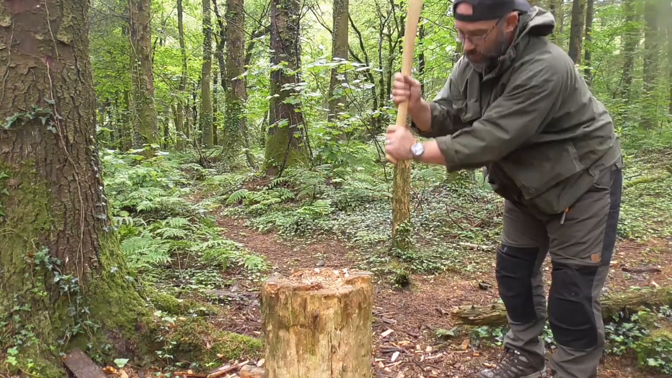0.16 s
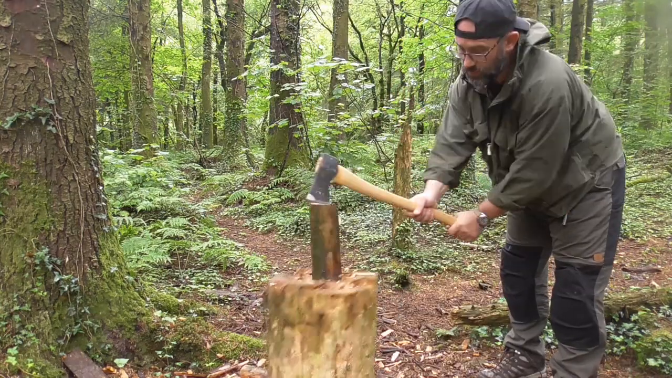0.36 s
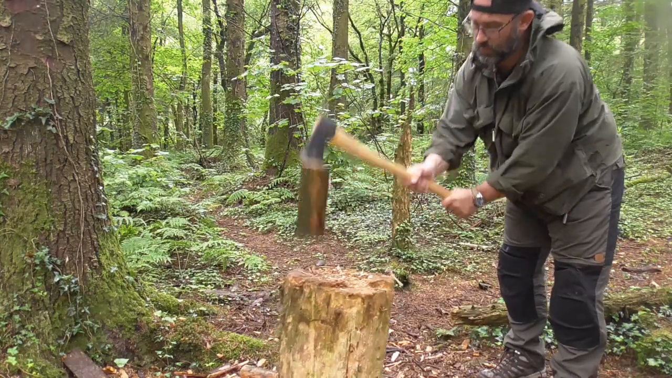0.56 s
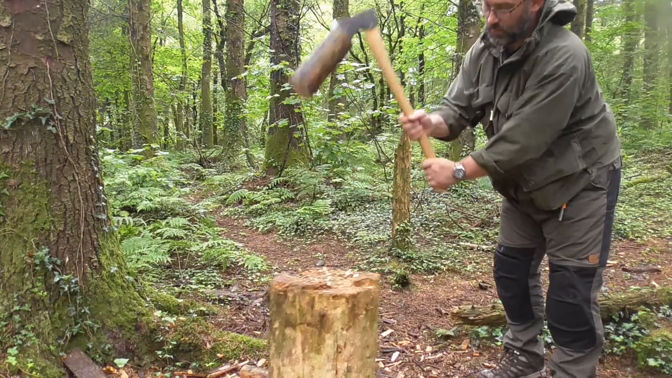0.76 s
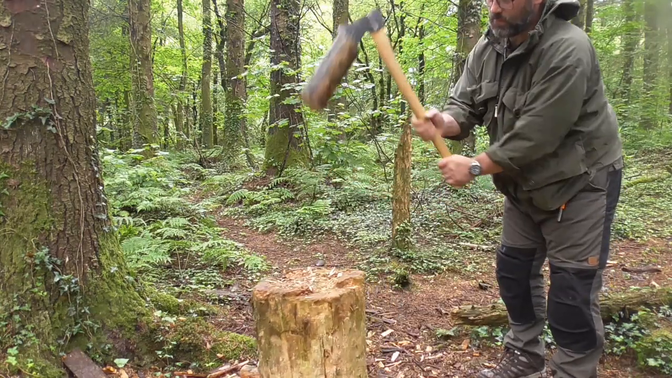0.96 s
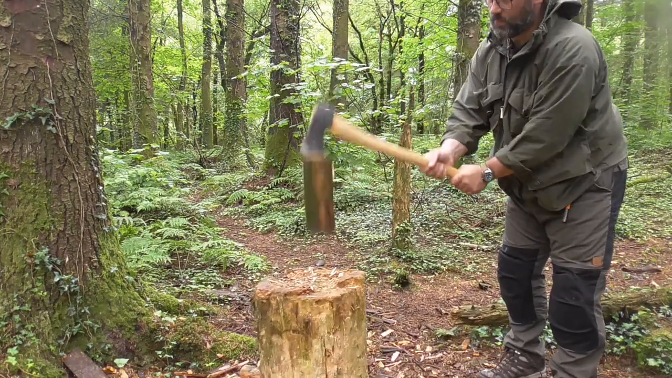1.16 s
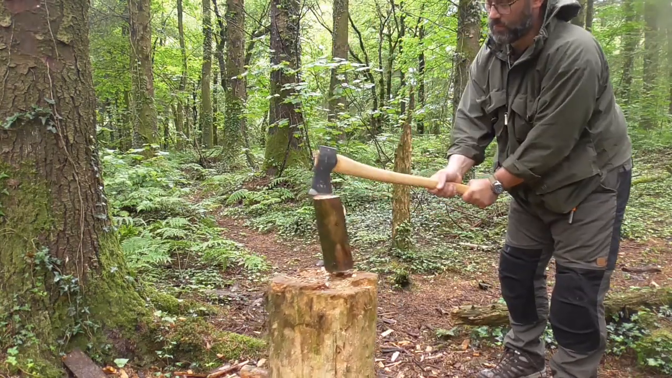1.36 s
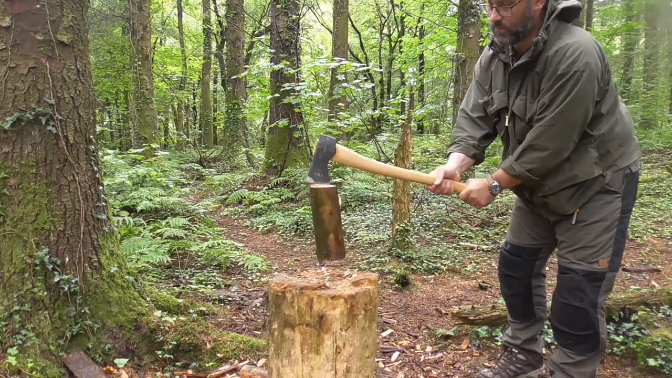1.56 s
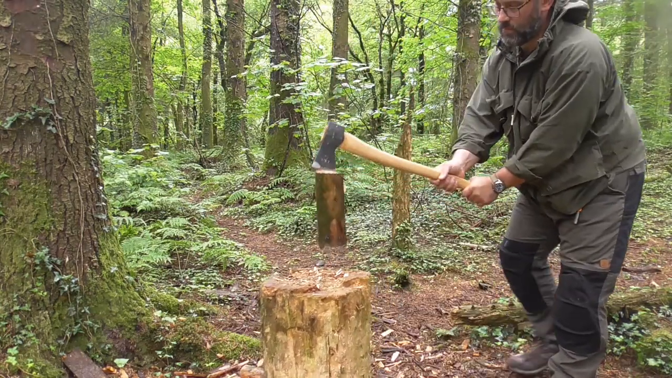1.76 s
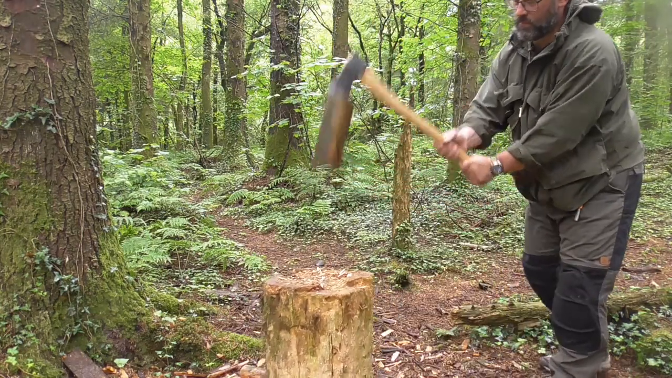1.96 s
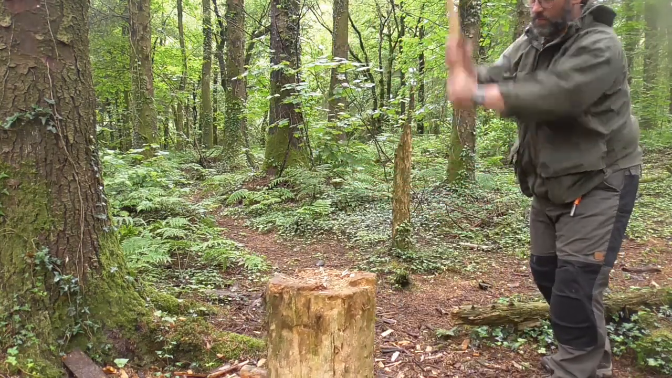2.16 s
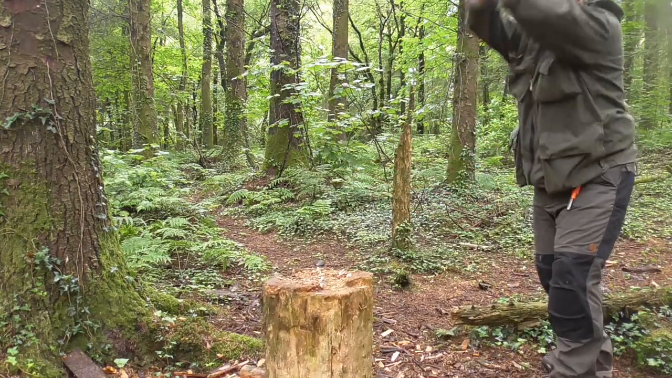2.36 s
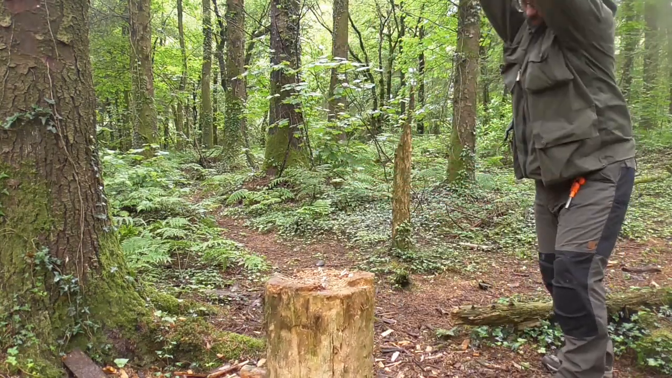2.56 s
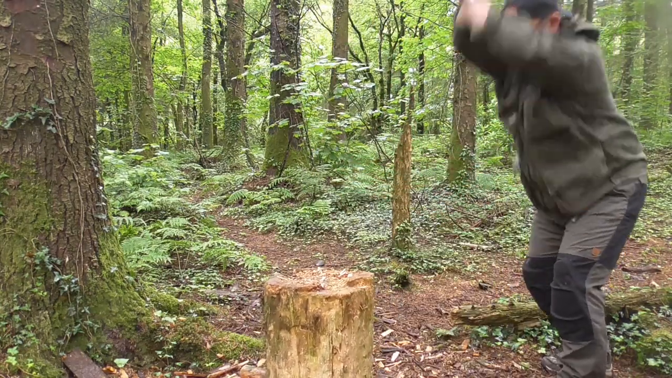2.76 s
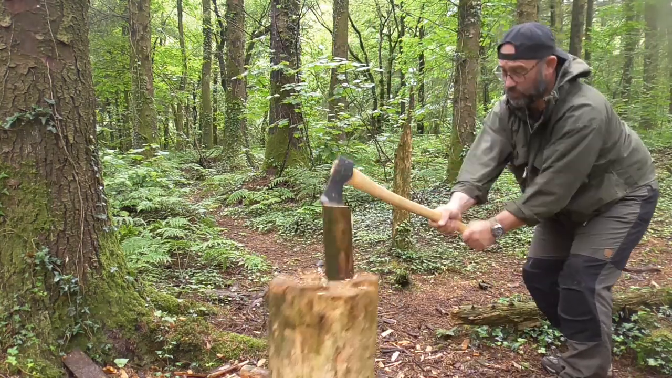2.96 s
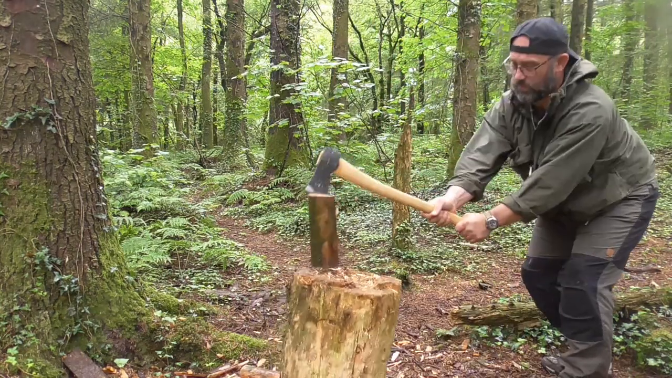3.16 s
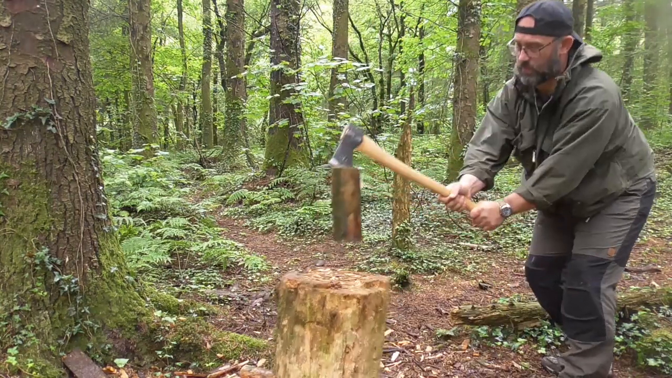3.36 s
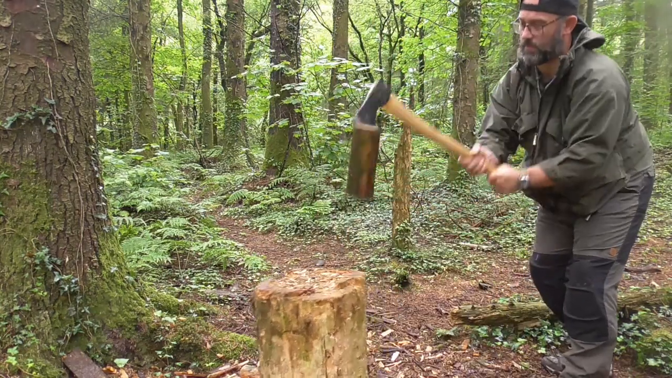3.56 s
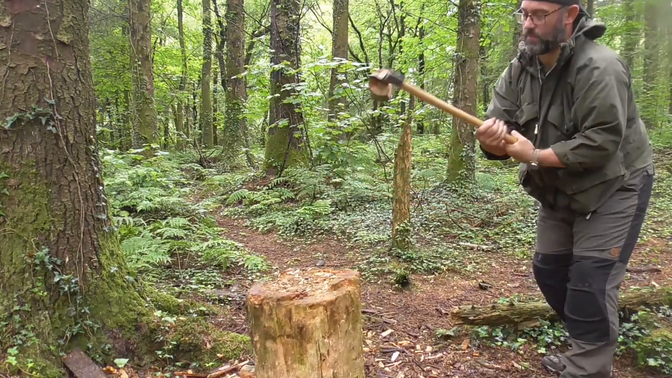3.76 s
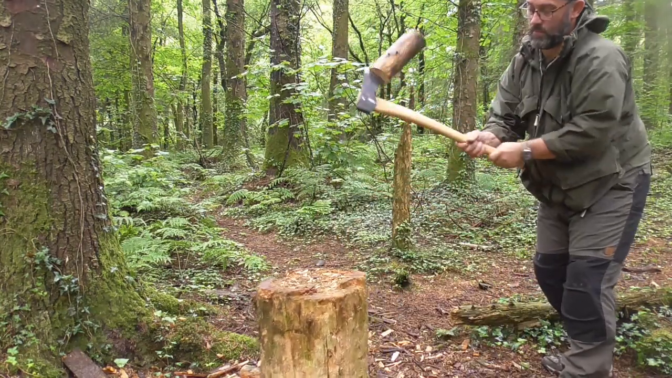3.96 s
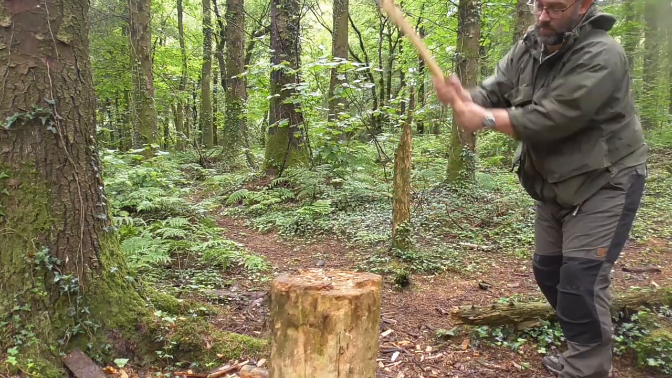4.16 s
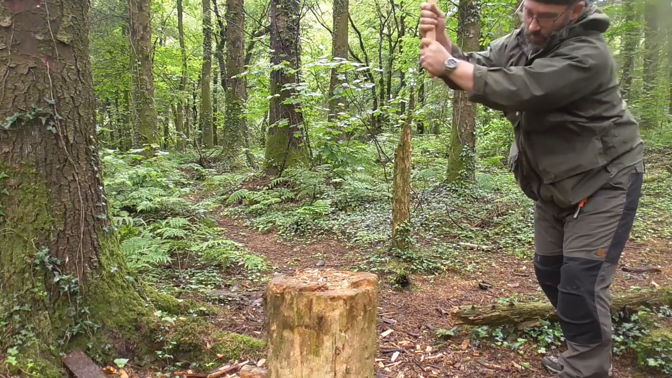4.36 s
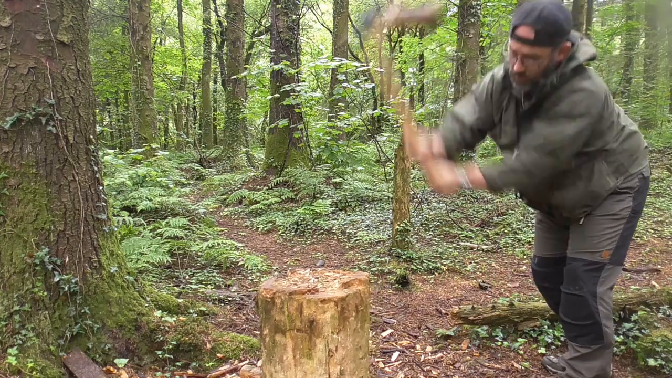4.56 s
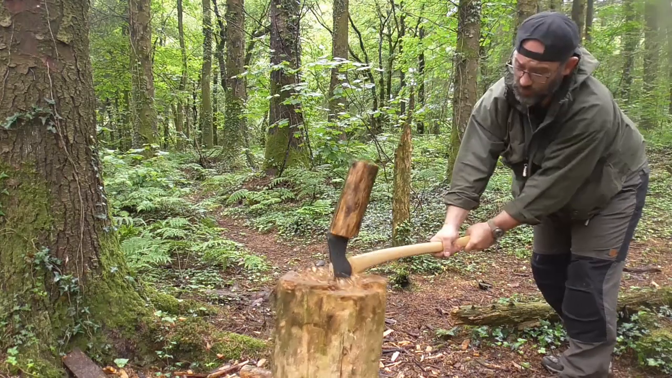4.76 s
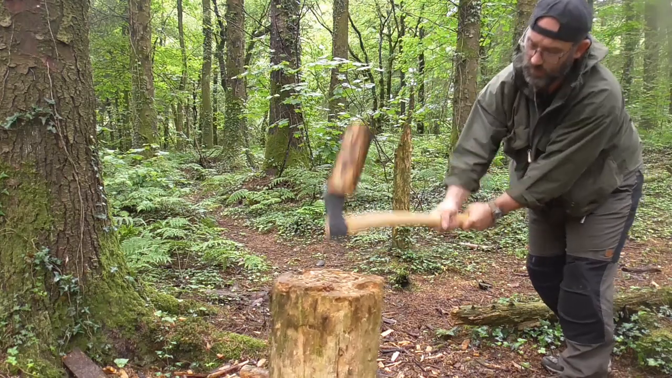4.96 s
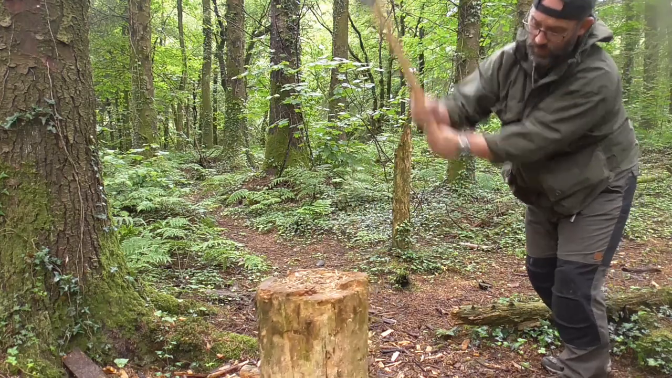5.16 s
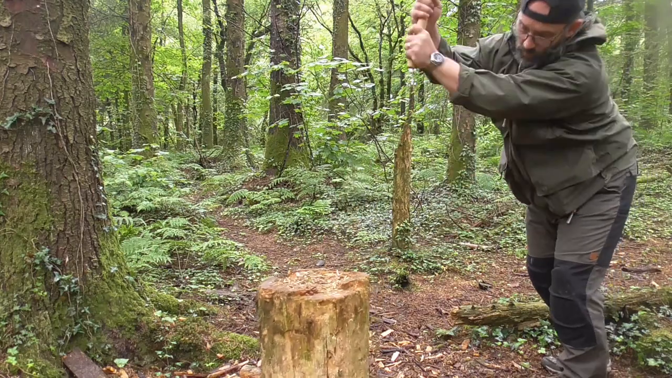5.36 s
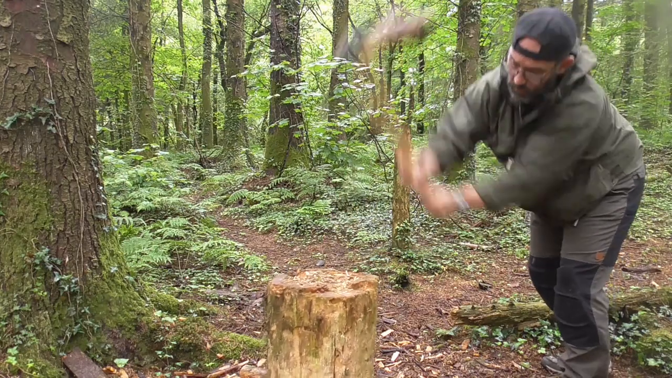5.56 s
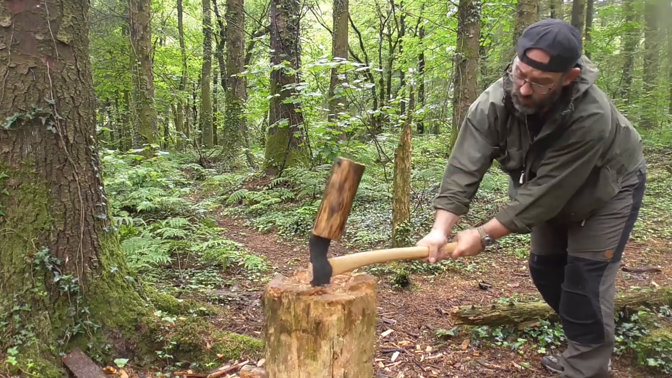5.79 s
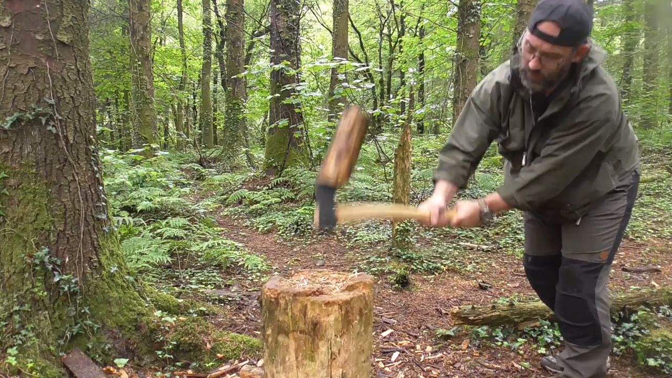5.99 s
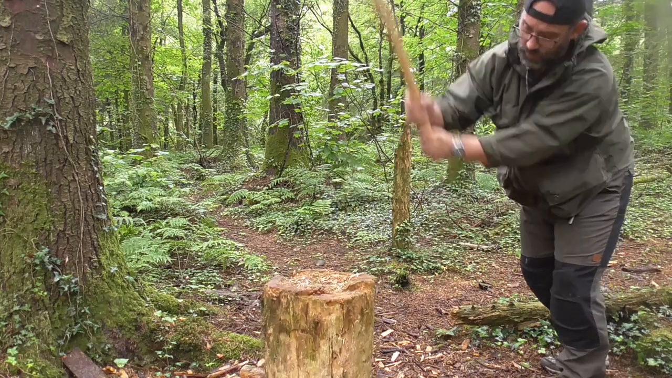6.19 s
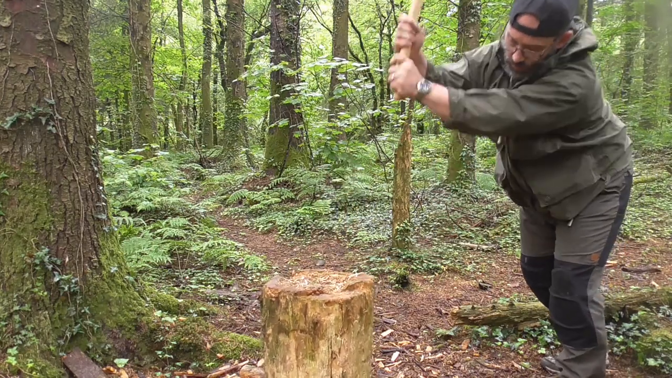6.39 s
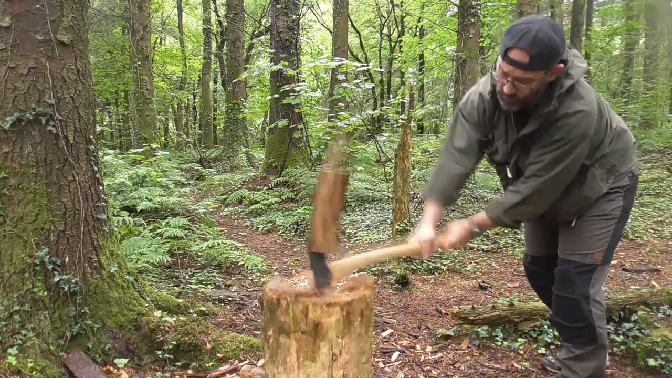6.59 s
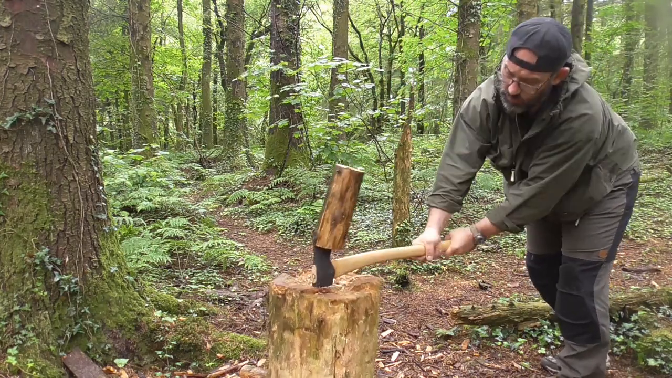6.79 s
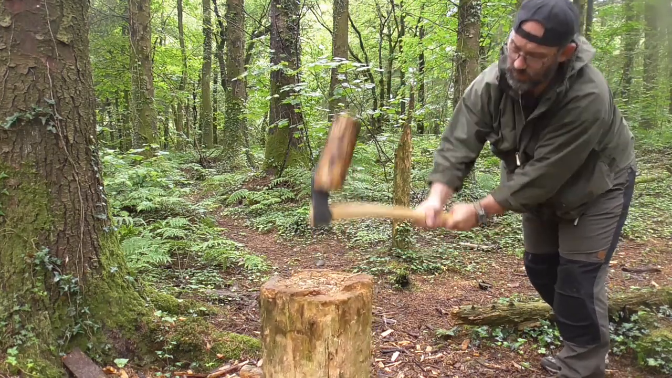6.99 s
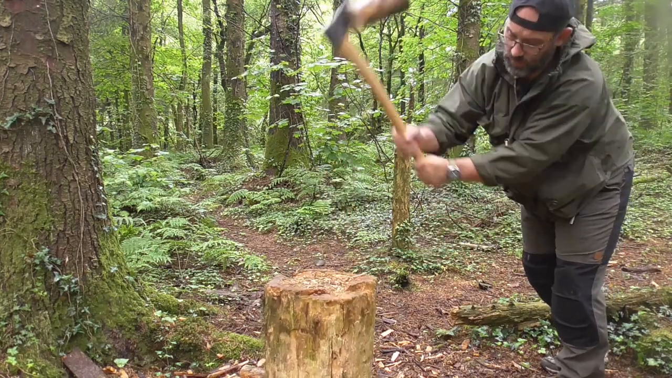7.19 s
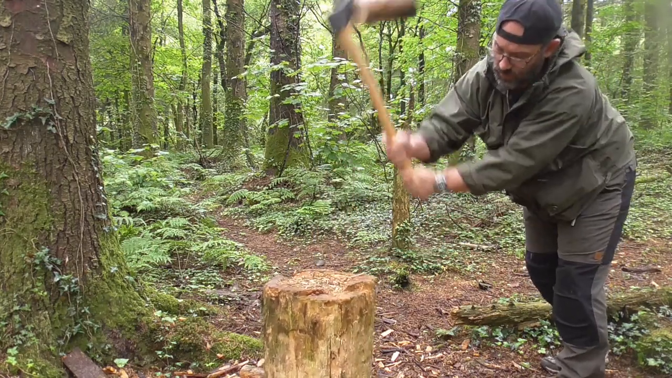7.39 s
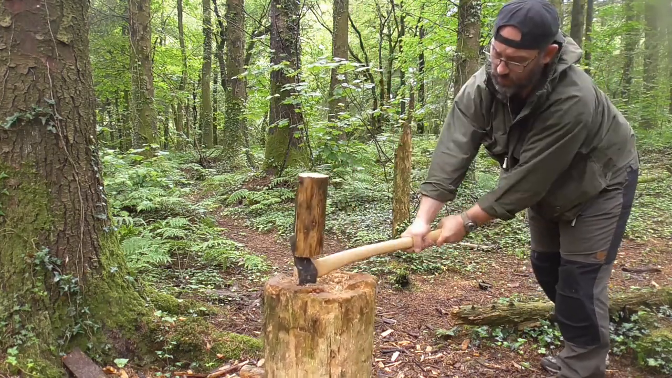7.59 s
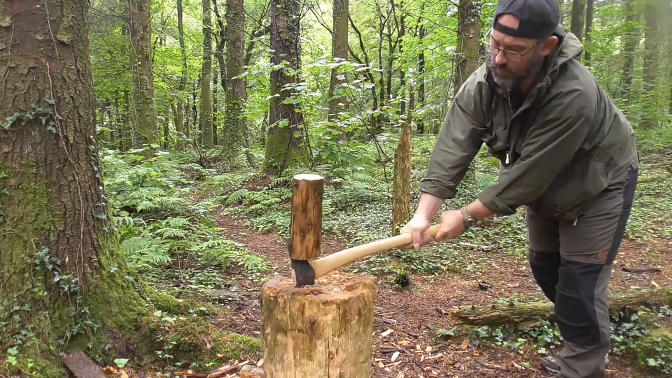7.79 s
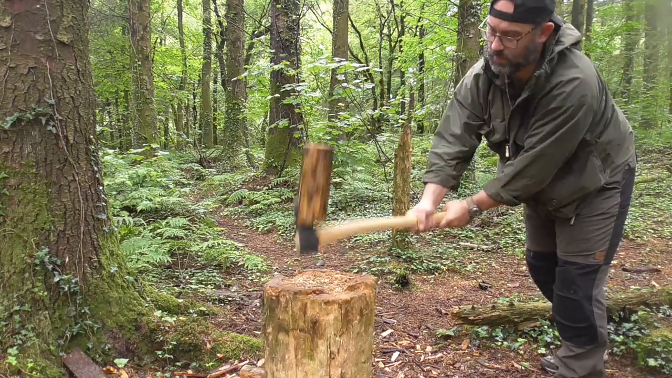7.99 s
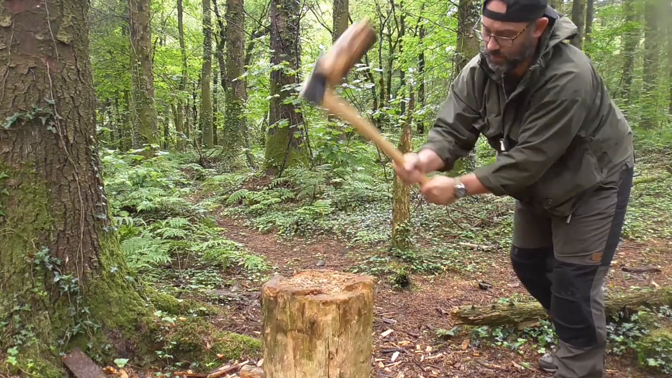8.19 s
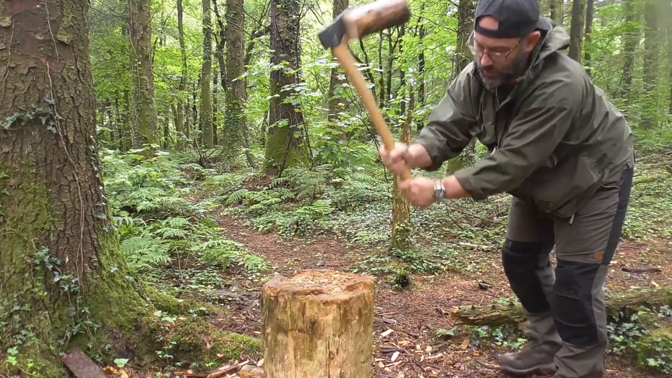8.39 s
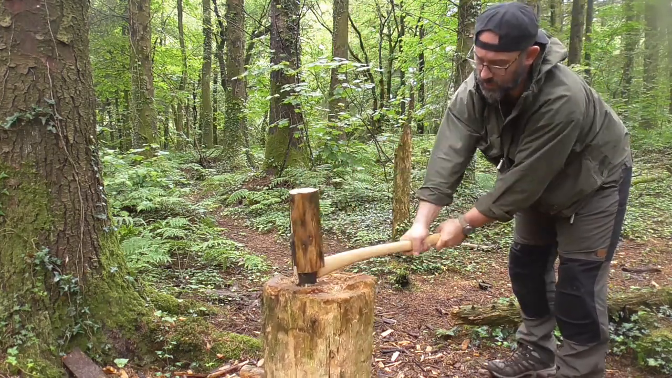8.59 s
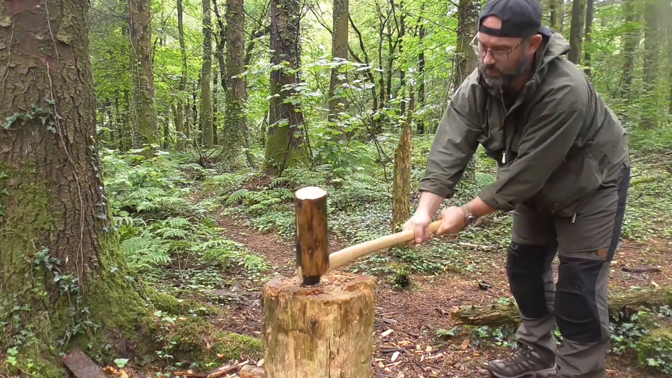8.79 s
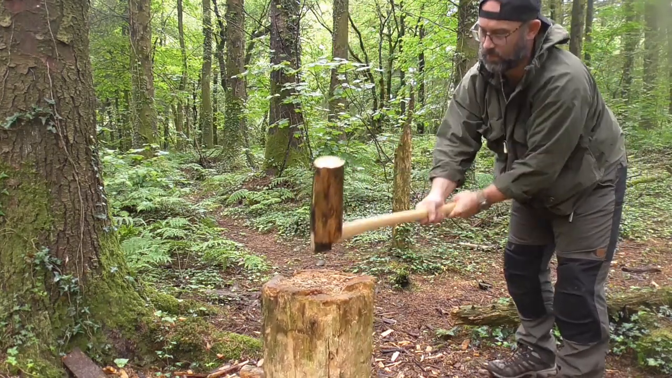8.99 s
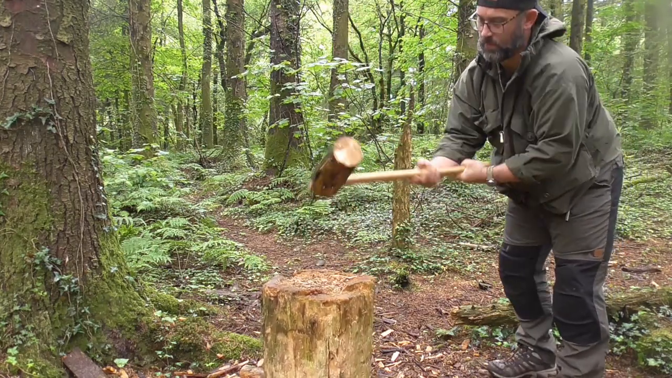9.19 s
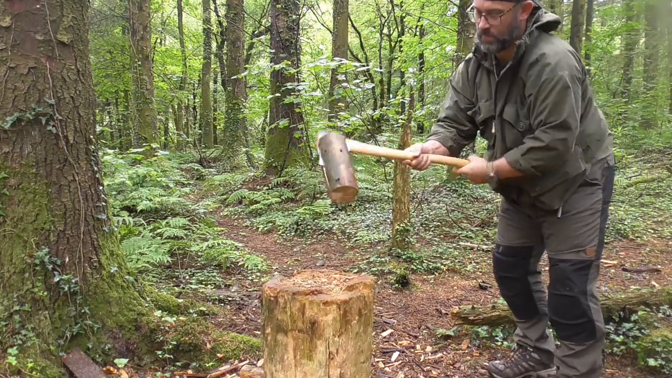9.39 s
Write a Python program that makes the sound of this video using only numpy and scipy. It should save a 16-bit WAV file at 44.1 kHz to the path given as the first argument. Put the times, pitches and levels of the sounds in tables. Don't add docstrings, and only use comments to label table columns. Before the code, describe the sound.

A quiet wood, heard in stereo from a few metres, with a very faint low distant drone. Soft jacket rustle and tiny dry ticks lead to a hollow wooden knock at 0.5 s, with a dull crack and ground thump. Until 3 s there is only cloth swishing, leaf hiss, small ticks and a faint bird whistle; then loose wood rattles around the heaviest blow at 3.1 s. Further slams follow at 4.8, 5.8, 6.8, 7.7 and 8.7 s, short and woody, with brighter, sharper fibre cracks and brief echoes off trunks. The block rocks back softly after most blows, and small chips patter down. Splinters tear and snap around 7.5-7.9 and 8.5 s; the last blow bursts into dense crackle. Light ticks, a thin bird call near 9.1 s and jacket rustle close it by about 9.5 s.

```python
import sys
import numpy as np
from scipy import signal
from scipy.fft import rfft, irfft, next_fast_len
from scipy.io import wavfile
from scipy.ndimage import uniform_filter1d, map_coordinates

SR = 44100
rng = np.random.default_rng(int(sys.argv[2]) if len(sys.argv) > 2 else 0)


def amplitude_ratio(level_db):
    exponent = np.asarray(level_db, float) / 20
    return 10 ** exponent


def waveform_to_disk(signal):
    frames = np.transpose(np.atleast_2d(signal))
    scaled = np.clip(frames, -1, 1) * 32767
    samples = np.round(scaled).astype(np.int16)
    wavfile.write(sys.argv[1], SR, samples)


N = 416304
BURST = SR // 4

# (time [s], knock level [dB])
STRIKES = [
    (.5211, -2.7),
    (3.1295, 1.9),
    (4.8131, 1.2),
    (5.7978, -.6),
    (6.7636, -4.5),
    (7.6874, -3),
    (8.7108, 1.2),
]
PAN_DB = [-2.5, -3, -2.5, -3, -0.8, 0.5, -2]
# (frequency [Hz], level [dB])
BRIGHT = [(4500, -23.5), (6300, -15.5), (7400, -6.5), (9500, -2), (12000, 0), (14500, -7.5), (16500, -24),
          (18000, -80)]
# (frequency [Hz], level [dB])
DULL = [(700, -41), (1600, -3.5), (2600, -6.5), (4000, -1.5), (5150, -5), (5800, -11.5), (9000, -57.5)]
# (frequency [Hz], level [dB])
JACKET = [(60, -40), (150, -18), (300, -6), (500, -3.5), (900, -8), (1400, -10), (1800, -22), (3000, -28),
          (6000, -85.5)]


def unit(x):
    return x / np.sqrt(np.mean(x ** 2) + 1e-20)


def peaked(x):
    return x / np.abs(x).max()


def along(points, hz):
    f, v = np.transpose(points)
    return np.interp(np.log(hz + 1), np.log(f + 1), v)


def filtered(x, response):
    n = x.shape[-1]
    m = next_fast_len(2 * n)
    return irfft(rfft(x, m) * response(np.fft.rfftfreq(m, 1 / SR)), m)[..., :n]


def coloured(spectrum, size):
    return unit(filtered(rng.standard_normal(size), lambda hz: amplitude_ratio(along(spectrum, hz))))


def dying(t, t60, rise):
    return (1 - np.exp(-t / rise)) * amplitude_ratio(-60 * t / t60)


def bump(t, at, wide):
    return np.exp(-.5 * ((t - at) / wide) ** 2)


def wobble(rate):
    return map_coordinates(rng.standard_normal(int(N * rate / SR) + 4), [np.arange(N) * rate / SR])


def add(out, s, x, pan_db=-2.0):
    part = out[:, round(s * SR):][:, :x.shape[-1]]
    part += (x * amplitude_ratio([[pan_db / 2], [-pan_db / 2]]))[:, :part.shape[1]]


def blows():
    # (crack [dB], crack t60 [s], 2-5 kHz share [dB], lingering crackle [dB], ground [dB])
    breakage = [
        (-21, 0.029, 0, -36, -28),
        (-17.5, 0.038, -1.5, -48, -29),
        (-9.5, 0.0139, 0, -42, -31.5),
        (-16, 0.023, -5, -39, -31),
        (-15, 0.05, -4.5, -31, -33),
        (-8, 0.03, -8, -35.5, -41),
        (-18.5, 0.047, -2.5, -34, -44),
    ]
    # (edge bite re push [ratio], push lag [ms], tearing lag [ms])
    contact = [(.4, 0, .5), (.45, 0, 0), (.22, 0, .4), (.3, 0, .6), (.1, -.3, -.2), (.2, 0, 1.6),
               (.45, .3, -.5)]
    body_lag_ms = [0, 0, 0, 0, .8, 0, 0]
    # (frequency [Hz], width [Hz], level [dB])
    upright = [
        [(115.5, 71, -3), (229, 86, 2), (319, 34, 4), (447, 33.5, -0.5), (657, 82, -3), (800, 54, -9.5),
         (1137, 87, -0.5), (1390, 127, -2), (1600, 89, -10), (2450, 180, -7)],
        [(148.3, 94.6, -5.5), (176.6, 29, -55), (267, 23, -13), (456, 64, -1.5), (603, 34, -15.5),
         (703, 76, -16.5), (885, 73, -6), (1027, 100, -10), (1270, 93, -8), (1577, 52, -16)],
    ]
    # (frequency [Hz], width [Hz], level [dB])
    turned = [
        [(183.5, 166, -2), (287, 150, -0.5), (350, 51, -7), (456, 55, 0.5), (658, 115, -6.5), (874, 67, -6.5),
         (1110, 157, -5.5), (1266, 120, -5), (1524, 96, -14.5), (2140, 81, -9)],
        [(127, 100, -12.5), (196, 66, -5), (323, 55, 1), (570, 73, 1.5), (717, 140, -3), (965, 77, -3),
         (1160, 113, -1), (1607, 78, -4.5), (2220, 190, -5.5)],
        [(125, 34, -6), (203, 63, 0), (330, 94, 2.5), (480, 108, 3), (690, 190, -9.5), (1082, 77, 2),
         (1500, 43, -8.5), (2010, 480, -8), (2640, 100, -20)],
    ]
    # (frequency [Hz], width [Hz], level [dB])
    opened = [
        [(105.1, 42, -12), (217.5, 102, -3), (358, 126, -0.5), (480, 157, -5.5), (692, 111, -15.5),
         (806, 45, -16), (950, 125, -13.5), (1310, 77, -10.5), (1613, 79, -13), (2064, 74, -14)],
        [(102, 50, -19), (169, 40, -12), (340, 155, -1), (555, 190, -3), (668, 120, -1.5), (853, 110, 1.8),
         (973, 110, 0.5), (1260, 62, -9.5), (1504, 75, -9.5), (1840, 44, -13)],
    ]
    out = np.zeros((2, N))
    for strike, broken, touch, lag_ms, pan_db, modes in zip(
            STRIKES, breakage, contact, body_lag_ms, PAN_DB, upright + turned + opened):
        s, db = strike
        crack_db, crack_t60, dull_db, linger_db, ground_db = broken
        bite, push_ms, tear_ms = touch
        hit = wood_knock(modes, db, bite, push_ms, lag_ms)
        hit = hit + tearing(crack_db, crack_t60, dull_db, linger_db, tear_ms)
        add(out, s, hit + amplitude_ratio(-32.0) * echo(hit.mean(axis=0)), pan_db)
        add(out, s, ground_thump(ground_db), pan_db=1.0)
    return out


def wood_knock(modes, db, bite, push_ms, lag_ms):
    t = np.arange(BURST) / SR
    lean_db = rng.normal(0, .95, len(modes)) * [[1], [-1]]

    def wood(f):
        total = 0
        for k, (hz, width_hz, mode_db) in enumerate(modes):
            gain = (-1) ** k * amplitude_ratio(mode_db + lean_db[:, k, None])
            resonance = 1j * f * width_hz / (hz * hz - f * f + 1j * f * width_hz)
            lag = np.exp(-2j * np.pi * f * lag_ms / 1000 * (hz < 800))
            total = total + gain * resonance * lag
        return total

    edge = bite * bump(t, .0005, .00015) / .15
    push = bump(t, .0013 + push_ms / 1000, .00012) / .12
    ring = filtered(edge - push, wood)
    return ring * amplitude_ratio(db) / np.abs(ring.mean(axis=0)).max()


def tearing(crack_db, crack_t60, dull_db, linger_db, tear_ms):
    t = np.arange(BURST) / SR
    spurts = amplitude_ratio(4 * unit(uniform_filter1d(rng.standard_normal(BURST), size=40)))
    u = np.maximum(t - .0008 - tear_ms / 1000, 0)
    tear = spurts * (dying(u, crack_t60, 0.00079) + amplitude_ratio(-19.5) * dying(u, 0.047, 0.0019))
    linger = amplitude_ratio(linger_db) * spurts * dying(u, .4, .01)
    fibres = snap(BURST, dull_db) * tear + snap(BURST, dull_db) * linger
    return filtered(fibres, lambda hz: hz < 15300) * amplitude_ratio(crack_db - 5)


def ground_thump(ground_db):
    # (frequency [Hz], level [dB])
    soil = [(20, -28), (50, -2.5), (95, -0.5), (150, -8.5), (300, -37)]
    t = np.arange(BURST) / SR
    heave = bump(t, .028, .006) * np.sin(2 * np.pi * 72 * (t - .028))
    rebound = bump(t, .08, .006) * np.sin(2 * np.pi * 46 * (t - .08))
    rumble = coloured(soil, BURST) * dying(np.maximum(t - .03, 0), 0.27, .008)
    return (heave + 0.092 * rebound + 0.12 * rumble) * amplitude_ratio(ground_db + 1.5)


def echo(x):
    # (frequency [Hz], t60 [s])
    woodland = [(60, 0.25), (300, 0.1), (1000, 0.23), (4000, 0.25), (12000, 0.073), (16000, .02)]
    hz, t, z = signal.stft(rng.standard_normal((2, BURST)), SR, nperseg=256)
    decay = amplitude_ratio(-60 * t / along(woodland, hz)[:, None])
    tail = signal.istft(z * decay, SR, nperseg=256)[1]
    tail /= np.linalg.norm(tail[0])
    return signal.fftconvolve(np.pad(x, (60, 0))[None], tail, axes=1)[:, :BURST]


def snap(size, dull_db):
    def one():
        return coloured(BRIGHT, size) + amplitude_ratio(dull_db) * coloured(DULL, size)
    return one() + .28 * one() * [[1], [-1]]


def cracks():
    crack_s = [.5236, .5246, 3.1305, 3.1311, 3.1321, 3.1335, 3.1348, 4.8145, 4.8151, 4.8157, 4.8176, 5.7994,
               5.7999, 5.8006, 5.8025, 6.7641, 6.7646, 6.7667, 6.7686, 7.6903, 7.6908, 7.6923, 7.6927,
               7.6931, 7.6941, 8.7118, 8.7126, 8.7135, 8.7148, 8.7183, 8.7208, 8.724]
    crack_db = [-11.5, -13, -15, -15.5, -9, -13.5, -16.5, -15.5, -11, -7.5, -18.5, -5.5, -15, -6, -11.5,
                -8.5, -4.5, -8.5, -15, -5.5, -5, -6.5, -10, -6.5, -20, -10, -11, -5, -9, -4.5, -6, -14.5]
    top_db = [-7, 2.5, 3, -1, -2, 3, 1.5]
    # (frequency [Hz], width [Hz], level [dB])
    wall_modes = [
        [(2340, 160, 5), (3800, 230, -3.5)],
        [(2540, 690, -3), (3810, 190, -3)],
        [(3500, 700, -0.5), (4700, 1000, 0)],
        [(3530, 230, -0.5), (5250, 520, -11)],
        [(3620, 570, 1.5), (5210, 390, -9)],
        [(3550, 230, -3.5), (5400, 490, 3)],
        [(3300, 530, -4.5), (4300, 600, 4)],
    ]
    wall_db = [-6, -8.5, -5, -7, -4.5, -12.5, -7]
    out, t = np.zeros((2, N)), np.arange(SR // 50) / SR
    for s, db in zip(crack_s, crack_db):
        blow = np.argmin([abs(s - at) for at, _ in STRIKES])
        bright = [(f, g + top_db[blow] * (f > 11000)) for f, g in BRIGHT]
        click = breaking(len(t), bright, dull_db=-20.5, spike_db=7, lag_s=.0002, t60=0.0046)
        wall = 0
        for hz, width_hz, g in wall_modes[blow]:
            wall = wall + amplitude_ratio(g) * np.sin(2 * np.pi * hz * t) * np.exp(-np.pi * max(width_hz, 300) * t)
        add(out, s, amplitude_ratio(db) * (click + amplitude_ratio(wall_db[blow]) * peaked(wall)), PAN_DB[blow])
    return out


def breaking(size, bright, dull_db, spike_db, lag_s, t60):
    n = np.arange(size)
    fray = rng.standard_normal((2, size)) * dying(np.maximum(n / SR - lag_s, 0), t60, 0.00015)
    one, other = fray + amplitude_ratio(spike_db) * (n == round(lag_s * SR)) * [[1], [.8]]

    def colour(f):
        return unit(amplitude_ratio(along(bright, f))) + amplitude_ratio(dull_db) * unit(amplitude_ratio(along(DULL, f)))
    return peaked(filtered(one + .28 * other * [[1], [-1]], colour))


def splinters():
    # (time [s], peak [dB], sliver ring re peak [dB], sliver frequency [Hz], t60 [s])
    tears = [(3.9, -37, 0, 5400, 0.014), (7.5299, -27, -9.5, 3620, 0.021), (7.533, -29.5, -14, 3620, .012),
             (7.666, -31, -23, 2970, 0.0088), (7.747, -28, -26, 2970, 0.017),
             (7.903, -18, -11.5, 3600, 0.0085), (7.903, -31.5, -1.5, 1660, 0.029),
             (7.9057, -28, -10, 1720, 0.015), (7.9062, -33, -8, 3300, .03),
             (8.498, -16.5, -1.5, 3370, 0.0053), (8.5, -29, -3, 2860, 0.008),
             (8.4987, -36.5, 7.5, 1690, 0.022), (8.5016, -13.5, -11, 6980, 0.0051),
             (8.718, -24, -5, 4020, 0.0072), (8.7218, -8.5, -34, 2560, 0.012)]
    out, t = np.zeros((2, N)), np.arange(BURST) / SR
    for s, db, ring_db, hz, t60 in tears:
        tear = snap(BURST, dull_db=-11) * (dying(t, 0.0039, 0.00073) + 0.18 * dying(t, 0.018, .0004))
        ring = amplitude_ratio(ring_db) * np.sin(2 * np.pi * hz * t) * dying(t, t60, 0.00056)
        thud = amplitude_ratio(-24.5) * coloured(JACKET, BURST) * dying(t, 0.014, 0.0013)
        tail = amplitude_ratio(-22) * echo(tear.mean(axis=0) + ring)
        add(out, s, amplitude_ratio(db - 0.5) * (tear + ring + thud + tail))
    return out


def rocking():
    # (time [s], level [dB], frequency [Hz], t60 [s])
    rocks = [
        (0.65, -39, 69.4, .06),
        (3.289, -20, 124, 0.021),
        (4.965, -36, 58.6, 0.042),
        (5.949, -21.5, 150, 0.012),
        (6.905, -38, 72, 0.067),
        (7.82, -52.5, 59, .1),
    ]
    out, t = np.zeros((2, N)), np.arange(BURST) / SR
    for s, db, hz, t60 in rocks:
        add(out, s, amplitude_ratio(db) * np.sin(2 * np.pi * hz * t) * dying(t, t60, 0.0058))
    return out


def ticks():
    # (time [s], peak [dB], 1.5-4.5 kHz share [dB], centre [Hz])
    clear = [(0.1521, -37.5, -27, 11150), (0.3105, -38, -29, 8850), (0.9858, -33.5, -2.5, 7100),
             (1.036, -43, -19, 7500), (1.0523, -36.5, -8, 8300), (1.1334, -39, -2, 5500),
             (1.1425, -33, -8, 12600), (1.9664, -42, 15, 4060), (2.0858, -31.5, -14.5, 11900),
             (2.2147, -34.5, -9, 12000), (2.8835, -38.5, -35, 8570), (2.8953, -39, -26.5, 12300),
             (2.9238, -35.5, -3, 4140), (3.0816, -33, -20, 11730), (3.2944, -31, -10.5, 11800),
             (3.517, -39, -19, 7830), (3.5838, -36, -28, 7770), (3.9, -39, -9, 5380),
             (3.914, -34, -14, 8600), (4.1942, -31, -14, 8500), (4.6897, -33.5, -11.5, 9800),
             (5.472, -36.5, -15, 9400), (5.6511, -42, -4, 3920), (6.0761, -33, -34, 11000),
             (6.1006, -37, -29, 4370), (6.1849, -26, -19.5, 9100), (6.2118, -31.5, -43, 9200),
             (6.2422, -36, -24, 9100), (8.2916, -32, -39, 8730), (8.3553, -32.5, -21.5, 10800),
             (8.6018, -34.5, -14, 13100)]
    out = np.zeros((2, N))
    for s, db, dull_db, hz in [*clear, *faint_ticks()]:
        bright = [(hz * 0.28, -25), (hz * 0.83, -5), (hz, 0), (hz * 1.17, -7), (hz * 3, -22), (40000, -60)]
        tick = breaking(SR // 40, bright, dull_db + 2, spike_db=12, lag_s=.0008, t60=.004)
        add(out, s, amplitude_ratio(db + 6) * tick)
    return filtered(out, lambda hz: hz < 15600)


def faint_ticks():
    # (time [s], peak [dB], centre [Hz])
    weak = [(0.0887, -37, 8796), (0.1795, -48, 4230), (0.2094, -40.5, 10700), (0.3461, -38, 8700),
            (0.9343, -40, 9500), (0.9482, -39, 6150), (1.2264, -45.5, 9910), (1.4287, -55.5, 9400),
            (1.4935, -42, 8850), (1.734, -42.5, 9120), (2.4284, -47, 3310), (2.6998, -50, 3020),
            (2.7297, -43.5, 11800), (2.7437, -38, 10800), (3.0485, -43, 9630), (3.3603, -47.5, 4060),
            (3.5618, -45, 3110), (3.5764, -39, 7780), (3.7125, -46, 4570), (3.7494, -36.5, 4700),
            (3.9699, -41, 4570), (4.0542, -42.5, 8280), (4.7646, -37.5, 9040), (5.4291, -38, 7700),
            (5.5962, -55, 3900), (6.1074, -41.5, 4240), (6.1464, -45, 4390), (6.2504, -48, 8610),
            (6.2607, -33, 12270), (6.2714, -41, 9030), (6.2854, -40, 8800), (6.348, -37.5, 11200),
            (6.3774, -43.5, 8700), (6.5949, -39.5, 11300), (6.6278, -42, 9410), (6.9411, -37.5, 12870),
            (7.1616, -40, 8120), (7.3262, -39, 8230), (7.3467, -51, 9060), (7.3784, -49, 9120),
            (7.4194, -48.5, 4500), (7.4724, -45, 9850), (7.9124, -39, 9560), (7.9174, -43.5, 8000),
            (7.9324, -54, 3320), (8.1878, -45, 5150), (8.3335, -37.5, 11730), (8.5574, -46.5, 9110),
            (8.9875, -43, 4460), (9.1701, -38, 3540)]
    s, db, hz = np.transpose(weak)
    dull_db = -36 + 6 * (rng.random(len(s)) - .5)
    return np.transpose([s, db - 1.5, dull_db, hz])


def knocks():
    # (time [s], peak [dB], frequency [Hz])
    taps = [(0.15, -47.5, 173), (0.226, -46, 950), (0.552, -42, 1290), (0.981, -49, 990),
            (1.969, -46.5, 550), (2.275, -43, 470), (2.343, -42, 495), (2.427, -41, 380),
            (2.452, -51, 1290), (2.484, -48, 400), (2.52, -45.5, 700), (2.574, -47, 570),
            (2.609, -45.5, 800), (2.644, -47, 546), (2.587, -46, 950), (2.91, -43.5, 1470),
            (2.954, -33, 466), (3.014, -34, 476), (3.259, -36, 520), (3.284, -33.5, 530),
            (3.658, -36.5, 527), (3.901, -42.5, 800), (4.483, -42.5, 450), (4.608, -39.5, 510),
            (4.702, -39.5, 447), (4.782, -45, 454), (5.293, -48, 920), (5.495, -41, 389),
            (5.649, -39.5, 853), (6.101, -47, 1200), (6.103, -45, 400), (6.483, -34.5, 364),
            (6.545, -46.5, 480), (6.674, -45, 467), (6.722, -41.5, 330), (6.734, -40, 480),
            (7.181, -45.5, 1100), (7.183, -41, 305), (8.468, -45, 532), (9.103, -51, 1410),
            (9.16, -49, 475)]
    # (time [s], peak [dB], frequency [Hz])
    rattle = [(2.891, -49, 503), (2.911, -43, 860), (2.926, -53, 1500), (2.94, -47, 1510),
              (2.935, -45, 517), (2.958, -41, 1360), (2.965, -41, 503), (2.99, -45, 493), (3.004, -37, 480),
              (3.04, -40, 423), (3.056, -39, 514), (3.072, -46, 599), (3.09, -46, 480), (3.104, -38, 400),
              (3.193, -37, 466), (3.207, -43, 513), (3.221, -44, 463), (3.232, -39, 418), (3.245, -39, 480),
              (3.272, -34.5, 450), (3.31, -46, 480), (3.324, -47, 450), (3.342, -42, 493), (3.37, -41, 480),
              (3.39, -44, 447), (3.421, -46, 480), (3.446, -47, 571)]
    # (time [s], peak [dB], frequency [Hz])
    chips = [(0.643, -34, 764), (0.681, -45, 670), (0.731, -51, 494), (4.901, -44, 517), (4.935, -38, 496),
             (5.094, -49, 501), (5.885, -53, 799), (5.918, -47, 363), (6.852, -53, 554), (8.799, -46, 775),
             (8.834, -37, 1010), (8.95, -52, 475), (8.975, -49, 334), (9.046, -46, 380)]
    out, t = np.zeros((2, N)), np.arange(SR // 10) / SR
    for s, db, hz in taps + rattle + [(s, db - 10.5, hz) for s, db, hz in chips]:
        mode = np.sin(2 * np.pi * hz * t) * dying(t, 0.033, 0.0028)
        spectrum = [(hz * 0.15, -20), (hz, 0), (hz * 2.6, -8), (hz * 5, -35), (30000, -90)]
        puff = 0.56 * coloured(spectrum, len(t)) * dying(t, 0.025, 0.0023)
        add(out, s, amplitude_ratio(db + 6) * (mode + puff))
    return out


def rustle():
    # (frequency [Hz], level [dB])
    sleeve = [(3500, -50), (5500, -13.5), (6500, -7), (8500, -3), (11000, -1), (13500, -5), (15300, -14.5),
              (15600, -43), (18000, -70.5)]
    # (frequency [Hz], level [dB])
    litter = [(800, -42.5), (1800, -6), (2600, -5.5), (4000, -0.5), (5200, -4.5), (6200, -5), (8000, -28.5),
              (12000, -73)]
    # (frequency [Hz], level [dB])
    far = [(15, -20), (50, -4.5), (150, -1.5), (400, 0), (1000, -6), (1700, -28.5), (4000, -69)]
    crumple, move = crumpling(), movement()
    stir = amplitude_ratio(2 * -87.5) + amplitude_ratio(2 * -5) * move + amplitude_ratio(2 * -14) * crumple
    lumps = amplitude_ratio(0.89 * wobble(17) + 2.4 * wobble(60) + 1.1 * wobble(140))
    jacket = np.sqrt(crumple) * unit(lumps * rush(JACKET, patchy_db=0.5))
    grain = amplitude_ratio(0.8 * wobble(25) + 1.8 * wobble(400))
    swish = np.sqrt(move) * grain * rush(sleeve, patchy_db=1.3)
    leaves = np.sqrt(stir) * grain * rush(litter, patchy_db=1.2)
    drone = amplitude_ratio(-61 + 1.1 * wobble(2.9)) * rush(far, patchy_db=2.1)
    return (jacket + swish + leaves + drone) * amplitude_ratio([[-.7], [.7]])


def crumpling():
    # (downswing [dB], recoil [dB])
    effort = [
        (-74, -52),
        (-53.5, -48),
        (-58.5, -52),
        (-55, -52.5),
        (-57.5, -57.5),
        (-62.5, -80.5),
        (-59.5, -56),
    ]
    # (time [s], half length [s], level [dB])
    bends = [
        (.1, 0.29, -59.5),
        (1.957, 0.088, -59),
        (2.5, 0.14, -54),
        (2.961, 0.053, -49),
        (3.604, 0.29, -58.5),
        (4.35, 0.38, -60.5),
        (6.195, 1, -64),
        (7.202, 0.15, -63.5),
        (9.2, 0.25, -60.5),
    ]
    swells = list(bends)
    for (s, _), (down_db, recoil_db) in zip(STRIKES, effort):
        swells += [(s - 0.0018, 0.099, down_db), (s + 0.13, 0.14, recoil_db)]
    t = np.arange(0, N, 32) / SR
    s, wide_s, db = np.transpose(swells)[..., None]
    power = (amplitude_ratio(2 * db) * np.exp(-((t - s) / wide_s) ** 2)).sum(axis=0)
    return np.interp(np.arange(N) / SR, t, amplitude_ratio(2 * -62.5) + power)


def movement():
    # (start [s], length [s], level [dB])
    moves = [(-.1, 0.43, -64.5), (0.46, 0.075, -59), (.6, 0.29, -66.5), (.95, 0.14, -69),
             (1.126, 0.058, -58), (1.757, 0.68, -66), (2.28, 0.38, -63.5), (2.934, 0.042, -55.5),
             (3.04, .2, -59), (3.527, 0.42, -59), (4.15, 0.34, -62), (4.658, 0.34, -63.5),
             (5.23, 0.37, -64), (5.716, 0.22, -60.5), (6.1, 0.39, -63), (6.71, 0.25, -59.5),
             (7.207, 0.21, -65), (7.707, 0.19, -59), (8.135, 0.21, -63.5), (8.494, 0.16, -61.5),
             (8.718, 0.19, -60.5), (9.07, 0.42, -58), (9.356, .2, -57.5)]
    rise_s, fall_s, still_db = 0.028, 0.045, -66.5
    t = np.arange(0, N, 32) / SR
    s, length, db = np.transpose(moves)[..., None]
    rise = (np.maximum(s - t, 0) / rise_s) ** 2
    fall = np.maximum(t - s - length, 0) / fall_s
    power = (amplitude_ratio(2 * db) * np.exp(-rise - fall)).sum(axis=0)
    return np.interp(np.arange(N) / SR, t, amplitude_ratio(2 * still_db) + power)


def rush(spectrum, patchy_db):
    # (frequency [Hz], left-right likeness [correlation])
    alike = [(60, 0.15), (240, 0.63), (950, 0.55), (3770, 0.5), (15000, 0.074)]
    z = signal.stft(rng.standard_normal((2, N)), nperseg=512)[2]
    field = uniform_filter1d(rng.standard_normal(z.shape[1:]), size=6, axis=0)
    field = uniform_filter1d(field, size=8, axis=1)
    pair = signal.istft(z * amplitude_ratio(patchy_db * unit(field)), nperseg=512)[1][:, :N]

    def spread(hz):
        angle = np.arccos(np.clip(along(alike, hz), -1, 1)) / 2
        return amplitude_ratio(along(spectrum, hz)) * [np.cos(angle), np.sin(angle)]
    mid, side = filtered(pair, spread)
    return unit(np.array([mid + side, mid - side]))


def birds():
    # (start [s], length [s], first frequency [Hz], last frequency [Hz], level [dB])
    calls = [
        (1.005, .035, 3790, 3690, -67),
        (2.655, .145, 3350, 2960, -67.5),
        (3.06, .05, 3200, 3080, -66),
        (8.106, .24, 5330, 5170, -69),
        (9.105, .06, 5900, 4700, -64),
    ]
    out, t = np.zeros(N), np.arange(N) / SR
    for s, length, first_hz, last_hz, db in calls:
        u = np.clip((t - s) / length, 0, 1)
        hz = first_hz + (last_hz - first_hz) * (1 - (1 - u) ** 3)
        phase = 2 * np.pi * np.cumsum(hz) / SR
        swell = np.sqrt(np.abs(np.sin(np.pi * u)))
        out += amplitude_ratio(db + 2.5 * wobble(70)) * swell * np.sin(phase + .8 * wobble(150))
    return out


def scene():
    return blows() + cracks() + splinters() + rocking() + ticks() + knocks() + rustle() + birds()


def band_limit(x):
    return signal.sosfilt(signal.butter(12, 16570, fs=SR, output="sos"), x)


def record(dry):
    thin = filtered(dry, lambda hz: (1j * hz / (45 + 1j * hz)) ** 2)
    thin = filtered(thin, lambda hz: 1 - 0.27 * np.exp(-((hz - 6150) / 700) ** 2))
    held = thin / (1 + np.abs(thin / 1.05) ** 4) ** (1 / 4)
    mix = filtered(held, lambda hz: np.clip((16800 - hz) / 1100, 0, 1) ** 2)
    return band_limit(mix)


dry = scene()
out = record(dry)
waveform_to_disk(out)
```